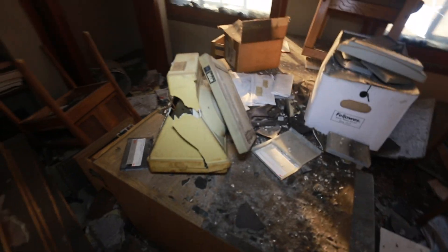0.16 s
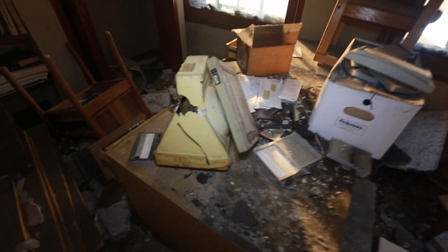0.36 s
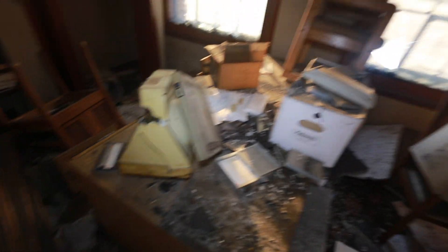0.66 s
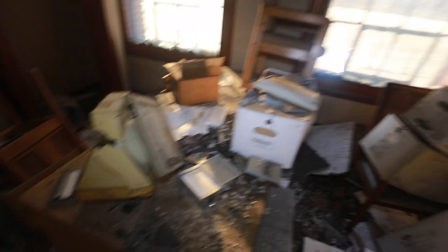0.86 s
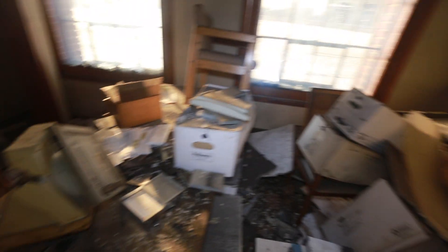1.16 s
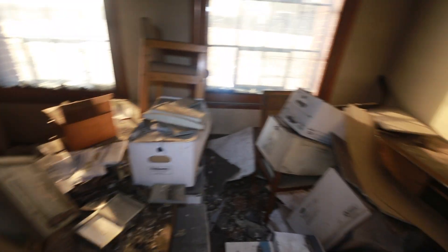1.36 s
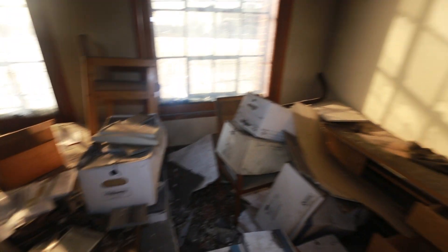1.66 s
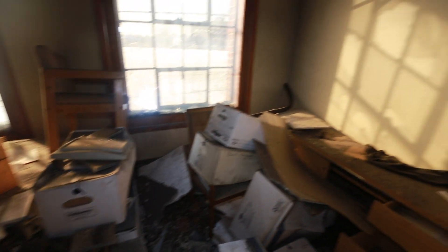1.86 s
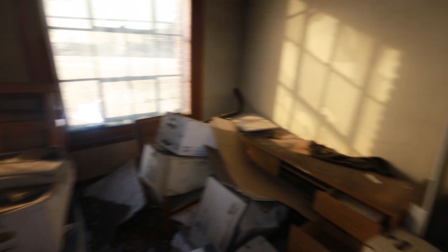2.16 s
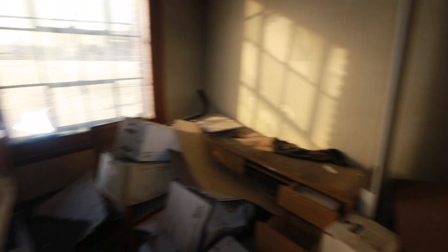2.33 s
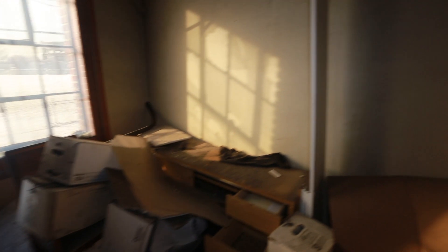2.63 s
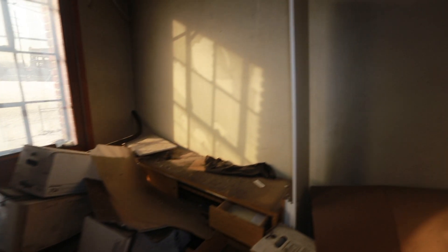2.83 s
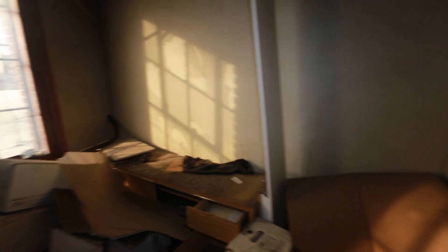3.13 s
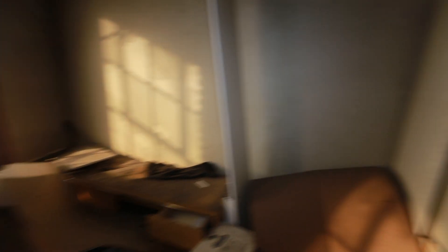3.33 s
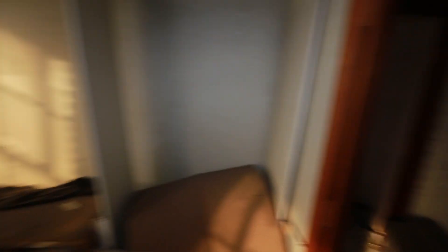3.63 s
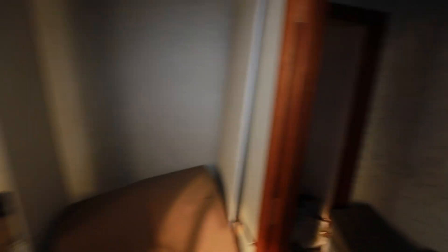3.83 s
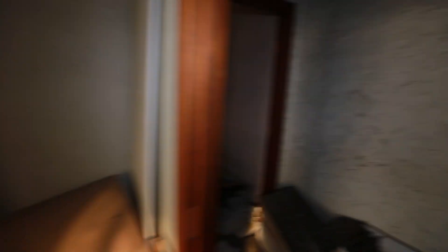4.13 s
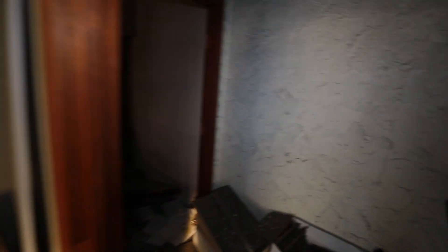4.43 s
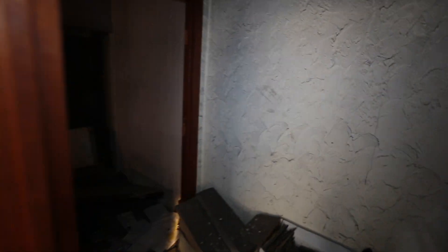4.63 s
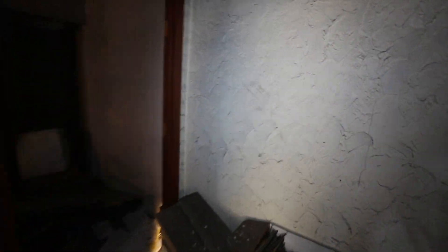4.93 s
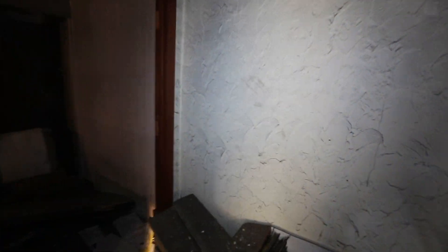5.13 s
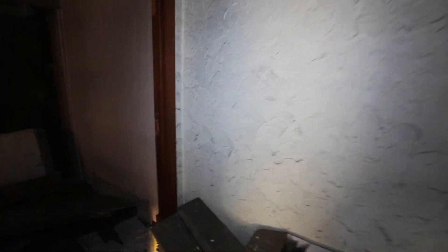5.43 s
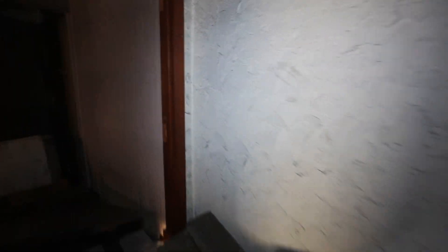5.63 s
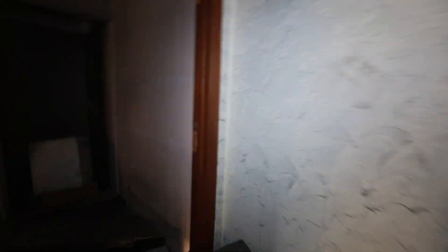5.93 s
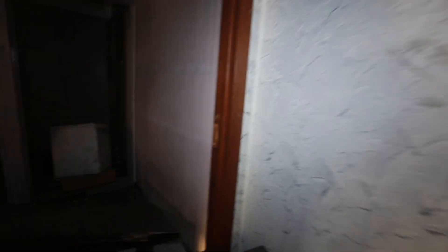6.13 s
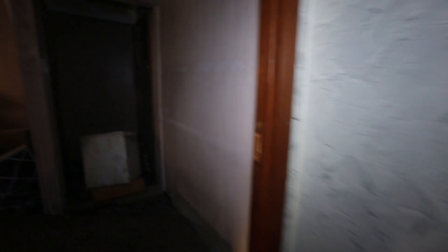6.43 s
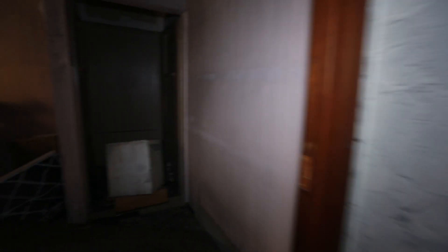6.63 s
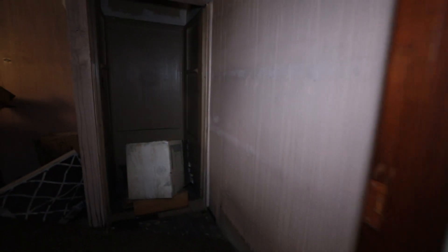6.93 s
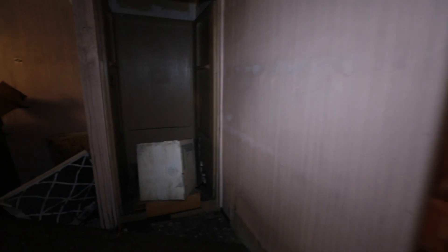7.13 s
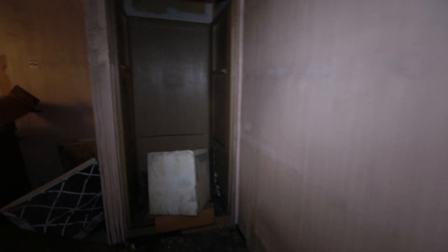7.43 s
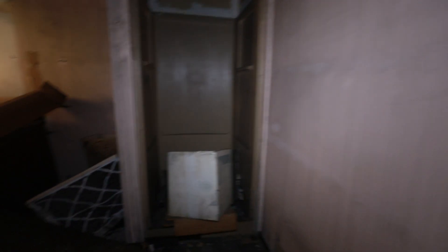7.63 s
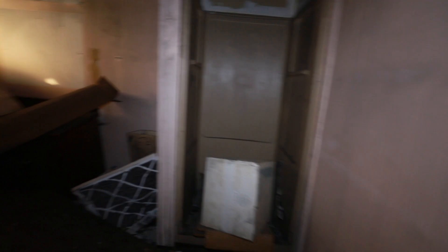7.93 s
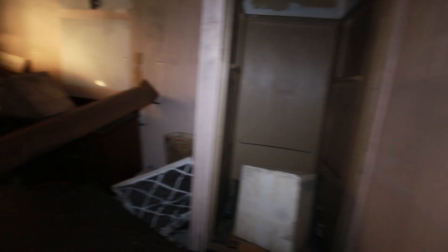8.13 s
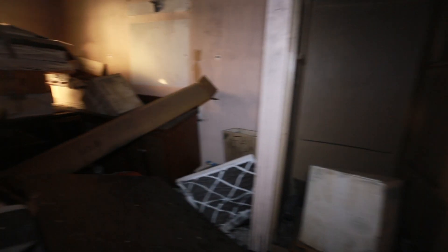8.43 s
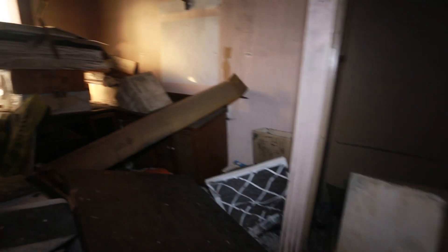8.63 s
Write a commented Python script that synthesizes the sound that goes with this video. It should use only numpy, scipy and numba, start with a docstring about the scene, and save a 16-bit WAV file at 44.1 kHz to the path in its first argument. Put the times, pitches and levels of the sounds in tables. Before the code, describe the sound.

In a derelict room, someone walks slowly across a littered wooden floor, heard close up. Quiet gritty scuffs give way to brittle clicks of plaster, one loud sharp crunch and then a dull thud of a heel on boards. Near the end a shoe scrapes and loose wood knocks, and the steps turn light. The bare walls add a very short echo over faint, still air.

```python
"""Slow steps over plaster grit and broken boards in an empty house, heard close on a hand-held camera.
At first the soles mostly scuff, grinding grit and flexing the floor, with a crunch near 0.85 s; from 2 s
bursting crumbs and ticking shards come thicker. Near 4.7 s comes the hardest crunch, near 6.1 s a heel
thuds heavily, and near 7.7 s a sole drags and loose pieces knock before the last light steps.
Throughout, the bare walls answer briefly over still room tone."""
import sys
import numpy as np
from scipy import signal
from scipy.fft import rfft, irfft, next_fast_len
from scipy.io import wavfile
from scipy.ndimage import uniform_filter1d
from numba import njit

SR = 44100
rng = np.random.default_rng(int(sys.argv[2]) if len(sys.argv) > 2 else 0)


def generate_wav(sig):
    """Save sig (samples, or channels by samples) to the path in sys.argv[1] as 16-bit PCM at SR."""
    pcm = np.round(np.clip(np.atleast_2d(sig).T, -1, 1) * 32767).astype(np.int16)
    wavfile.write(sys.argv[1], SR, pcm)


N = 386977


def soles(grit_gain, dust_gain, tilt_db):
    """Soles grind coarse grit and fine dust, steadily in a scuff and in a burst as they land."""
    # bands of grinding grit: f/Hz, level/dB
    grit_bands = [(700, 8.5), (1000, 7), (1500, 4.5), (2200, 2.5), (3200, 0.5), (4300, -12.5)]
    # bands of fine dust: f/Hz, level/dB
    dust_bands = [(5500, -8), (7500, 0), (10000, 1), (12500, -11.5), (15000, -10)]
    grit_burst, dust_burst = crunches()
    grit = grind(grit_bands, tilt_db, rate=6000, spread_db=2, flicker_db=1.5, q=1.55, share=0.09)
    dust = grind(dust_bands, 0, rate=8000, spread_db=1.5, flicker_db=2, q=2.1, share=0.21)
    return (grit_gain + grit_burst) * grit + (dust_gain + dust_burst) * dust


def scuffs(edge_db=-12):
    """Weight swells and eases on a sliding sole; gives grit, dust, floor and loose-board gains and tilt."""
    # slides: heaviest t/s, swell/s, ease/s, grit/dB, grit tilt/(dB/octave), dust/dB, floor/dB, loose/dB
    slides = [(0.0, .05, 0.077, -56.5, -1, -78, -46.5, -60),
              (0.63, 0.059, 0.07, -54, -2.5, -67.5, -59, -59), (0.89, 0.22, 0.086, -64, 1, -81, -46.5, -61),
              (1.14, 0.16, 0.24, -55.5, -2, -62, -54, -62), (1.46, 0.31, 0.41, -51.5, 1, -62, -48, -54.5),
              (1.79, 0.035, 0.19, -54, 3, -65, -51, -49), (1.89, 0.28, 0.2, -51, -0.5, -60, -51.5, -65),
              (2.08, 0.09, .15, -58, -4, -66, -49, -53), (2.23, .25, .3, -53.5, 1, -60, -52.5, -57.5),
              (2.55, .35, .1, -56, 1, -63, -54, -60.5), (2.68, .08, .1, -63, 0, -71, -52, -63),
              (2.84, 0.071, 0.54, -57.5, -2.5, -68, -58, -59), (3.13, 0.34, 0.077, -54, 1, -63, -47, -59),
              (3.28, .07, .25, -55.5, -1.5, -66, -50.5, -63), (3.45, .15, .2, -58, -0.5, -67, -57.5, -66),
              (3.89, .07, 0.24, -53, 0.5, -67, -47, -60), (4.2, 0.22, 0.19, -57, 0, -66, -55, -59),
              (4.56, .08, .15, -50, 0.5, -64.5, -49.5, -54), (4.7, .1, 0.092, -38.5, -0.5, -52, -42.5, -41),
              (5.05, .25, 0.083, -44, -1.5, -54.5, -46, -52.5), (5.12, .05, 0.054, -46, 1, -57, -44.5, -45),
              (5.23, 0.16, .25, -52, 1.5, -59, -53.5, -61), (5.71, 0.14, 0.24, -49.5, 0.5, -61, -49, -53),
              (5.96, 0.065, 0.25, -48.5, 3.5, -57.5, -63, -52),
              (6.06, 0.04, 0.12, -43, -6, -62, -32.5, -43.5), (6.16, 0.2, 0.23, -44, -4, -63, -40, -44),
              (6.41, 0.027, 0.16, -44.5, 2, -61.5, -59, -67.5),
              (6.51, 0.12, 0.14, -46, 2, -54, -43.5, -49.5),
              (6.83, 0.13, 0.1, -44.5, 0, -55.5, -44.5, -46.5),
              (6.89, 0.083, 0.064, -54, 0, -74, -56, -42.5), (7.1, 0.21, .16, -50, -1.5, -62.5, -52, -51),
              (7.37, 0.047, 0.15, -54.5, -2, -63, -50, -45.5),
              (7.49, 0.11, 0.21, -43, 1.5, -57.5, -49, -48), (7.62, 0.19, 0.28, -47, 7.5, -59.5, -58, -56),
              (7.78, 0.16, 0.095, -39, -1, -53, -53, -52), (7.97, 0.11, 0.23, -53.5, 1, -65, -68, -67),
              (8.24, 0.23, 0.11, -64, 1, -72, -51, -52.5), (8.39, .12, .2, -48, 0.5, -61, -55, -52),
              (8.7, 0.32, 0.33, -56, 1, -65.5, -74, -60)]
    rest_db = np.array([[-70], [-85], [-59.5], [-66]])  # grit, dust, floor, loose board between scuffs
    t = np.arange(0, N, 64) / SR
    power, tilt_sum = undb(2 * rest_db), 0
    for at, swell, ease, grit_db, tilt_db, dust_db, floor_db, loose_db in slides:
        load_db = edge_db * np.maximum((at - t) / swell, (t - at) / ease)
        layer_db = np.array([[grit_db], [dust_db], [floor_db], [loose_db]]) + load_db
        layer_power = undb(2 * layer_db)
        power = power + layer_power
        tilt_sum = tilt_sum + tilt_db * layer_power[0]
    curves = (*np.sqrt(power), tilt_sum / power[0])
    return [np.interp(np.arange(N) / SR, t, curve) for curve in curves]


def crunches(crest_db=21):
    """A landing sole crushes what lies under it: the grit and dust gains jump, then fade."""
    # landings: t/s, peak level/dB, dust against grit/dB, t60/s
    landings = [(0.745, -34, -13, 0.21), (0.851, -18, -19, 0.17), (1.678, -30.5, -24, 0.07),
                (1.779, -46, -6, 0.25), (2.746, -34.5, -16, 0.34), (2.913, -27.5, -25, 0.95),
                (2.974, -25, -22, 0.14), (3.106, -35, -6, 0.079), (3.613, -35, -9, 0.2),
                (3.717, -33, -11, 0.16), (3.811, -33.5, -3, 0.069), (3.892, -21, -13, 0.3),
                (4.499, -17, -13, 0.14), (4.565, -27, -30, 0.064), (4.588, -16.5, -17, 0.088),
                (4.677, -1, -11, 0.095), (4.87, -18.5, -14, 0.094), (4.898, -23, -10, 0.067),
                (4.931, -24, -14, 0.13), (4.983, -19.5, -12, 0.19), (5.167, -23.5, -5, 0.19),
                (5.746, -22.5, -10.5, 0.15), (5.955, -51, -15, 0.096), (6.032, -24.5, -13, 0.32),
                (6.096, -12.5, -39, 0.11), (6.196, -28.5, -26, 0.033), (6.387, -30, -7.5, 0.51),
                (6.818, -29, -31, 0.15), (7.495, -31, -14, 0.11), (7.711, -27.5, -31, 0.12),
                (8.164, -30, -17, 0.36), (8.187, -25, -11, 0.22), (8.539, -25, -10, 0.093),
                (8.674, -34, -0.5, 0.11)]
    t = np.arange(N) / SR
    grit, dust = np.zeros(N), np.zeros(N)
    for at, db, dust_db, t60 in landings:
        span = slice(int(at * SR), int((at + t60) * SR))
        fade = undb(db - crest_db - 60 * (t[span] - at) / t60)  # grains peak far above their mean level
        grit[span] += fade
        dust[span] += fade * undb(dust_db)
    return grit, dust


def grind(bands, tilt_db, rate, spread_db, flicker_db, q, share):
    """Grit slips under the sole; each band has its own grains plus rarer ones that all bands share."""
    shared_slips = unit(grains(rate / 20, spread_db))
    jerk = wander(25)
    out = 0
    for hz, db in bands:
        slips = unit(grains(rate, spread_db)) + share * shared_slips
        lift_db = tilt_db * np.log2(hz / 1800)  # sharp grit lifts the upper bands
        waver_db = flicker_db * (jerk + .5 * wander(40))
        out = out + undb(db + lift_db + waver_db) * ring_twice(slips, hz, hz / q)
    return out / np.sqrt(sum(undb(2 * db) * hz / q / SR for hz, db in bands))


def grains(rate, spread_db):
    """Single slips at random moments, mostly small, a few louder."""
    out, count = np.zeros(N), int(rate * N / SR)
    size_db = spread_db * np.minimum(rng.exponential(size=count), 4.5)
    out[rng.integers(0, N, count)] = rng.standard_normal(count) * undb(size_db)
    return out


def boards(floor_gain, loose_gain):
    """Shifting weight rubs the floor and a loose board, which ring in their low modes."""
    # floorboard modes: f/Hz, nominal width/Hz, level/dB
    floor_modes = [(58, 20, -20), (99, 38, -7.5), (169.7, 23, -3), (201.8, 34, -5), (277.5, 34.5, -6)]
    # loose-board modes: f/Hz, nominal width/Hz, level/dB
    loose_modes = [(357.6, 26, -8.5), (428, 84, 0), (535, 112, -5.5)]
    out = 0
    for gain, modes, flicker_db in (floor_gain, floor_modes, 4), (loose_gain, loose_modes, 2):
        wood = 0
        for hz, width, db in modes:
            level = undb(db + flicker_db * wander(18))
            wood = wood + level * unit(ring_twice(rng.standard_normal(N), hz, 1.71 * width))
        out = out + gain * unit(wood)
    return out


def heels():
    """A heel is mostly one contact, so the board thuds on its own pitch."""
    # heels on the boards: t/s, peak level/dB, f/Hz, t60/s
    thuds = [(0.844, -35, 258, 0.13), (1.376, -39, 166, 0.12), (1.642, -37.5, 186, 0.16),
             (2.916, -36, 159, 0.22), (2.988, -34.5, 153, 0.17), (2.985, -43, 66, 0.15),
             (3.136, -46.5, 118, 0.092), (3.51, -39.5, 210, 0.083), (3.613, -38, 179, 0.09),
             (3.711, -34.5, 171, 0.21), (3.745, -39.5, 173, 0.08), (3.92, -31.5, 174, 0.078),
             (4.584, -27, 294, 0.11), (4.673, -21.5, 244, 0.092), (4.71, -24.5, 176, 0.077),
             (4.867, -34, 264, 0.2), (5.109, -35, 254, 0.13), (5.751, -26, 270, 0.13),
             (6.038, -30, 104.7, 0.13), (6.065, -22.5, 320, 0.12), (6.071, -39, 58.6, 0.34),
             (6.092, -14.5, 162.5, 0.16), (6.12, -21, 173.4, 0.13), (6.15, -25.5, 164, 0.31),
             (6.215, -30, 162, 0.2), (6.38, -38, 170, 0.13), (6.416, -38, 173, 0.12),
             (6.519, -40, 207, 0.064), (6.8, -34.5, 169, 0.18), (7.445, -36, 183, 0.12),
             (7.474, -33, 187, 0.2), (8.146, -36.5, 175, 0.23), (8.537, -43.5, 210, 0.12)]
    rows = [(*thud, -26) for thud in thuds]
    return blows(rows, q=2.6, push=16, length_s=1 / 3, second_ratio=0.5, mode_db=9, rise_s=0.004)


def loose_pieces():
    """Loose pieces knock and rattle underfoot."""
    # knocks: t/s, peak level/dB, f/Hz, t60/s, second ring/dB
    knocks = [(0.744, -42, 415, 0.1, 1.5), (0.85, -26.5, 520, 0.031, -1), (1.677, -35, 388, 0.04, -29),
              (1.853, -40.5, 730, 0.06, -8), (1.893, -42, 750, 0.044, -11),
              (2.316, -25.5, 980, 0.014, -5.5), (2.316, -33.5, 443, 0.016, -6),
              (2.388, -35, 1410, 0.019, -16), (2.556, -36.5, 1620, 0.059, 2), (2.917, -35.5, 377, 0.1, -5),
              (2.974, -33, 960, 0.047, -16), (3.105, -37, 366, 0.018, -27), (3.138, -36.5, 366, 0.13, -8),
              (3.717, -44, 734, 0.064, -3), (4.313, -39.5, 574, 0.083, -6), (4.317, -40.5, 1090, 0.1, -31),
              (4.495, -36.5, 370, 0.2, -5), (4.563, -26.5, 706, 0.076, 1.5),
              (4.677, -12.5, 950, 0.054, -14), (4.872, -36, 415, 0.056, -11), (4.906, -31, 423, 0.063, -17),
              (4.93, -29.5, 433, 0.12, -1), (4.983, -34, 360, 0.17, -10.5), (5.567, -46, 700, 0.065, 4),
              (5.743, -31, 357, 0.13, -8), (5.758, -23.5, 447, 0.061, -13), (6.035, -24.5, 644, 0.083, -24),
              (6.046, -26.5, 584, 0.15, 5), (6.079, -19, 354, 0.086, -3.5), (6.198, -17, 1235, 0.11, -25),
              (6.198, -22.5, 609, 0.13, -14), (6.381, -38, 665, 0.11, -14), (6.589, -28, 361, 0.055, -5.5),
              (6.59, -35.5, 1246, 0.074, -12), (6.793, -38, 443, 0.07, -18), (7.07, -35.5, 456, 0.21, -23),
              (7.107, -31.5, 445, 0.14, -19), (7.352, -39, 434, 0.15, -18), (7.617, -36.5, 795, 0.066, -2),
              (7.710, -20.5, 440, 0.065, -7.5), (7.714, -14, 735, 0.054, -24),
              (7.736, -22, 790, 0.058, -9.5), (8.063, -40, 500, 0.067, -14),
              (8.337, -38.5, 428, 0.078, -15), (8.393, -38, 478, 0.054, -7)]
    return blows(knocks, q=1.82, push=1.37, length_s=1 / 4, second_ratio=1.92, mode_db=-15, rise_s=0.0023)


def shards(grit_gain, t60=0.018):
    """Shards snap with a short tick, with small stray ones among the grit."""
    # larger shards: t/s, peak level/dB, f/Hz
    large = [(0.1932, -45.5, 2530), (0.852, -31.5, 2250), (1.6796, -38, 2100), (2.113, -37, 1880),
             (2.339, -36, 1980), (2.389, -44, 1960), (2.399, -41, 1490), (2.487, -37.5, 1810),
             (2.516, -35, 3300), (2.5582, -27, 1870), (2.5805, -37, 3380), (2.9136, -33, 2210),
             (2.9756, -19, 3280), (3.1662, -34.5, 2320), (3.613, -43, 2060), (3.8945, -35.5, 2720),
             (4.4972, -29, 1970), (4.56, -32, 2000), (4.587, -29, 2040), (4.6558, -31, 2100),
             (4.6777, -12, 2210), (4.8579, -37, 2070), (4.873, -29, 2060), (4.8983, -25.5, 2230),
             (4.932, -31, 2080), (4.9583, -30, 3040), (4.9823, -34, 2090), (5.0559, -36, 1790),
             (5.1346, -41, 1810), (5.7436, -32, 1790), (5.9559, -34.5, 2460), (6.0955, -35, 1964),
             (6.3883, -34, 2940), (6.8176, -32.5, 2380), (7.4959, -21, 2400)]
    small = [(at, db, 2100) for at, db in strays(grit_gain, over_db=9, count=25)]
    rows = [(*snap, t60, -14) for snap in large + small]
    return blows(rows, q=1.5, push=2.8, length_s=1 / 12, second_ratio=2.2, mode_db=7)


def crumbs(dust_gain, t60=0.0074):
    """Plaster crumbs burst in bright clicks, each pitched by its own size."""
    # larger crumbs: t/s, peak level/dB, f/Hz
    large = [(0.851, -31, 4580), (2.0384, -48, 4500), (2.068, -45, 9150), (2.0906, -41, 4730),
             (2.166, -34, 7920), (2.1899, -32, 9950), (2.2272, -24, 10400), (2.2394, -30.5, 9660),
             (2.3111, -33, 10700), (2.3575, -39, 5060), (2.3714, -32.5, 10500), (2.4084, -39, 9930),
             (2.4384, -37, 9350), (2.4573, -30, 11100), (2.4862, -35, 4810), (2.5162, -25, 9980),
             (2.5561, -37, 4670), (2.58, -33, 7500), (2.6379, -40.5, 9400), (2.8953, -42, 4400),
             (3.8137, -40.5, 10000), (3.8901, -41, 5660), (4.1325, -36, 10200), (4.3613, -40.5, 4580),
             (4.3909, -44.5, 6730), (4.4972, -42, 4510), (4.5875, -40, 4570), (4.6663, -23, 5840),
             (4.6768, -15, 4700), (4.7486, -35, 4750), (4.873, -26, 9800), (4.8973, -38, 10400),
             (4.9574, -25, 7910), (4.9826, -36, 9480), (5.012, -36.5, 10200), (5.0344, -30, 6830),
             (5.0739, -24.5, 10050), (5.1352, -35, 5750), (5.1724, -25, 10200), (5.2006, -33, 5800),
             (5.239, -29, 9870), (5.382, -32.5, 9720), (5.4994, -36, 10500), (5.745, -32.5, 4740),
             (5.9474, -39, 7840), (6.0397, -39, 4790), (6.0616, -36, 4500), (6.7136, -36, 7770),
             (7.4904, -43, 4880), (8.1863, -34, 7560), (8.5375, -37, 4580), (8.6742, -38, 4550),
             (8.7006, -33, 8320)]
    small = [(at, db, 9450 * 2 ** (0.24 * rng.standard_normal()))
             for at, db in strays(dust_gain, over_db=15.5, count=160)]
    rows = [(*burst, t60, -12) for burst in large + small]
    return blows(rows, q=0.93, push=4.5, length_s=1 / 40, second_ratio=0.38, mode_db=-3)


def strays(gain, over_db, count, crowding=0.6, spread_db=2.5):
    """Small random snaps (t/s, level/dB), thicker and louder where the scuff is heavier."""
    when, size = rng.random((count, 2)).T
    odds = np.cumsum(gain ** crowding)
    at = np.searchsorted(odds, when * odds[-1])
    level_db = 20 * np.log10(gain[at]) + over_db - spread_db * np.log(1 - size)
    return zip(at / SR, level_db)


def blows(rows, q, push, length_s, second_ratio, mode_db, rise_s=0):
    """Each blow is a fading rattle through a wide resonance, the mode at its centre and a second ring."""
    out = np.zeros(N + SR)
    t = np.arange(int(length_s * SR)) / SR
    attack = np.minimum(t / max(rise_s, 1 / SR), 1)
    hardness = push * np.exp(-(rise_s / 0.0034) ** 2)  # a slow blow has a softer first contact
    for at, db, hz, t60, second_db in rows:
        first_contact = hardness * np.sqrt(SR / hz) * (t == 0)
        fade = undb(-60 * t / t60)
        force = first_contact + rng.standard_normal(len(t)) * fade * attack
        body = ring_twice(force, hz, hz / q) + undb(mode_db) * ring(force, hz, hz / 9)
        second = ring_twice(force * fade, second_ratio * hz, 0.64 * second_ratio * hz)
        blow = body / np.abs(body).max() + undb(second_db) * second / np.abs(second).max()
        i = int(at * SR)
        out[i:i + len(t)] += undb(db) * blow
    return out[:N]


def rasps():
    """A sole drags over rough board: dense stick-slip through one resonance, swelling and fading."""
    # drags: start/s, end/s, f/Hz, width/Hz, level/dB
    drags = [(0.525, 0.705, 1670, 1300, -55), (1.052, 1.24, 1250, 500, -63),
             (1.315, 1.483, 1270, 400, -54.5), (1.772, 1.942, 2570, 2560, -55),
             (1.775, 1.932, 4700, 2500, -56.5), (6.212, 6.28, 1255, 600, -37.5),
             (6.4, 6.58, 2500, 2500, -54), (6.796, 6.888, 2190, 1990, -48),
             (7.352, 7.88, 2966, 2800, -51.5), (7.729, 7.85, 870, 400, -42.5), (7.92, 8.118, 860, 297, -57)]
    out, slips = np.zeros(N), grains(rate=3000, spread_db=1.5)
    for start, end, hz, width, db in drags:
        i, j = int(start * SR), int(end * SR)
        swell = signal.windows.tukey(j - i, .6)
        out[i:j] += undb(db) * swell * unit(ring_twice(slips[i:j], hz, width))
    return out


@njit
def walls(x, lags, gain, damping):
    """Sound bounces between bare walls, duller each round: eight delay lines that feed each other."""
    line, dulled, out = np.zeros((8, 4096)), np.zeros(8), np.zeros(len(x))
    for i in range(len(x)):
        total = 0.
        for k in range(8):
            returning = gain[k] * line[k, (i - lags[k]) & 4095]
            dulled[k] += (1 - damping) * (returning - dulled[k])
            total += dulled[k]
            out[i] += dulled[k] * (1 - 2 * (k % 2))
        for k in range(8):
            line[k, i & 4095] = x[i] + dulled[k] - total / 4
    return out


def room_tone(level_db=-59.5):
    """The still air of the empty house: faint, steady, mostly low noise."""
    # room-tone spectrum: f/Hz, relative level/dB
    spectrum = [(15, -51), (25, -8.5), (123, -5.5), (190, 1.5), (317, -4.5), (714, -52), (1130, -19),
                (5570, -72), (14800, -37), (16000, -52)]
    hz, db = np.transpose(spectrum)
    n = next_fast_len(N)
    bin_hz = np.arange(n // 2 + 1) * SR / n + 1
    colour = undb(np.interp(np.log(bin_hz), np.log(hz), db))
    noise = irfft(rfft(rng.standard_normal(n)) * colour, n)[:N]
    return undb(level_db) * unit(noise)


def ring(x, hz, width):
    """Two-pole resonance, gain 1 at the centre."""
    return signal.lfilter(*signal.iirpeak(min(hz, .45 * SR), hz / width, fs=SR), x)


def ring_twice(x, hz, width):
    """The resonance applied twice, for steeper skirts."""
    return ring(ring(x, hz, width), hz, width)


def wander(rate):
    """Random levels held 1 / rate s and smoothed twice."""
    hold = int(SR / rate)
    steps = np.repeat(rng.standard_normal(N // hold + 1), hold)
    return uniform_filter1d(uniform_filter1d(steps, hold), hold)[:N]


def undb(db):
    """Gain of a dB value."""
    return 10 ** (np.asarray(db) / 20)


def unit(x):
    """Scaled to rms 1."""
    return x / np.sqrt(np.mean(x ** 2))


def scene():
    """Footsteps close to the microphone, the short answer of the walls, and room tone behind; mono."""
    grit_gain, dust_gain, floor_gain, loose_gain, tilt_db = scuffs()
    steps = soles(grit_gain, dust_gain, tilt_db) + boards(floor_gain, loose_gain)
    steps += heels() + loose_pieces() + shards(grit_gain) + crumbs(dust_gain) + rasps()
    bass_t60_s, echo_db = 0.16, -13.5
    lags = rng.integers(300, 1800, 8)  # wall-to-wall paths in samples
    echo = walls(steps, lags, undb(-60 * lags / SR / bass_t60_s), damping=0.9)
    return (steps + undb(echo_db) * echo + room_tone())[None]


def record(dry):
    """The microphone dulls the highest treble, its amplifier hisses, and the camera cuts the top."""
    dulled = signal.lfilter(*signal.butter(1, 13000, fs=SR), dry)
    hiss = undb(-73) * rng.standard_normal(dry.shape)
    top_cut = signal.ellip(10, .2, 70, 15800, fs=SR, output="sos")
    return signal.sosfilt(top_cut, dulled + hiss)


dry = scene()
out = record(dry)
generate_wav(out)
```